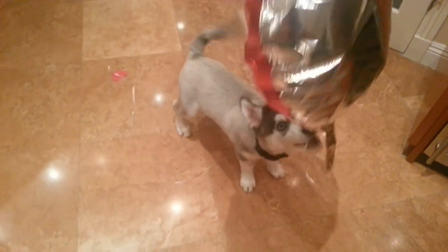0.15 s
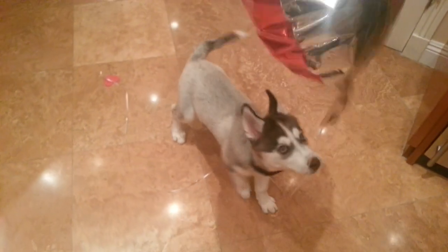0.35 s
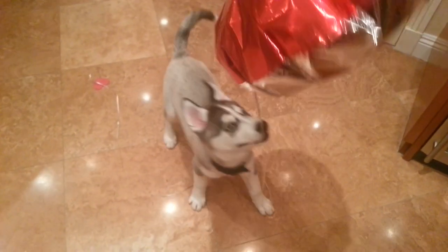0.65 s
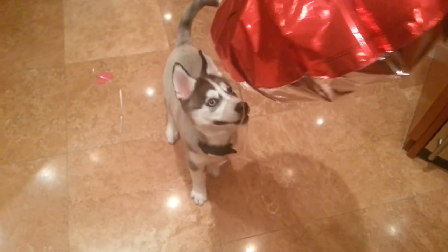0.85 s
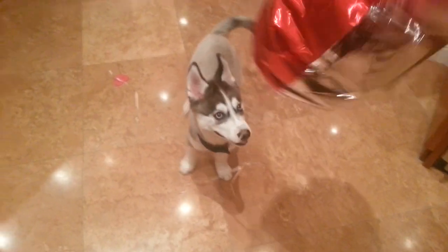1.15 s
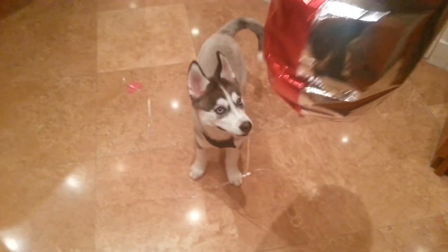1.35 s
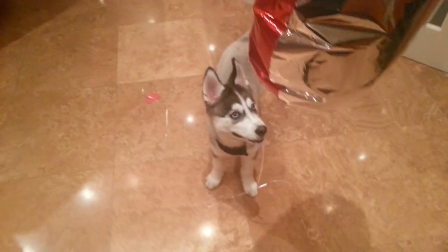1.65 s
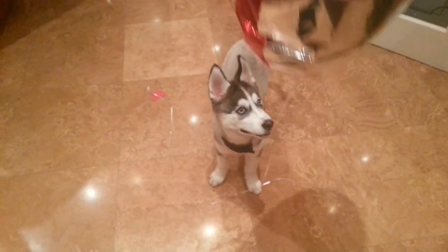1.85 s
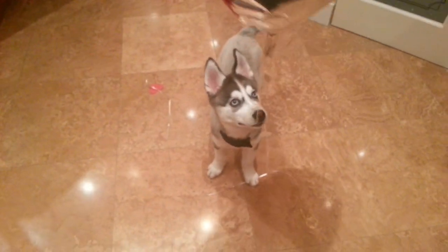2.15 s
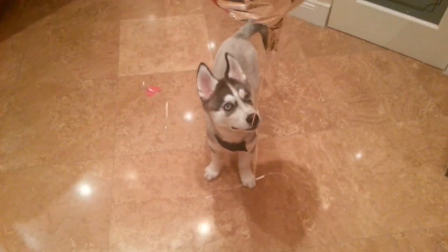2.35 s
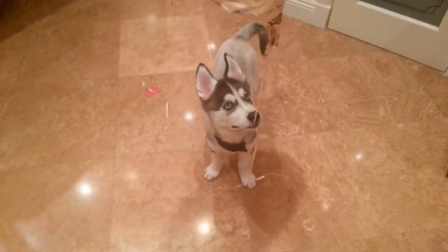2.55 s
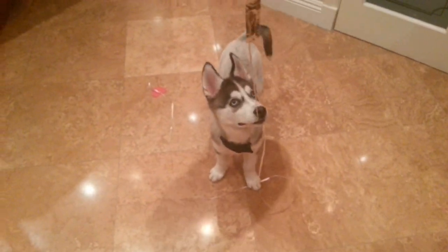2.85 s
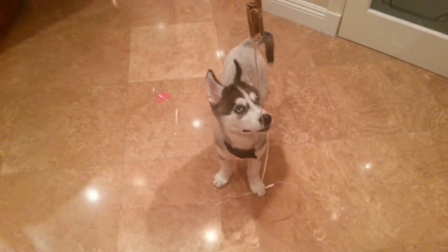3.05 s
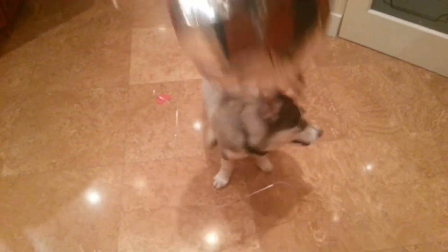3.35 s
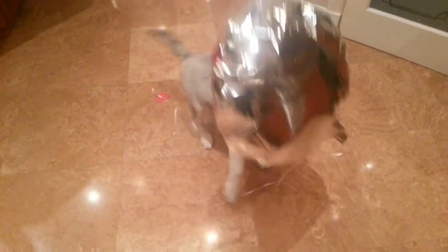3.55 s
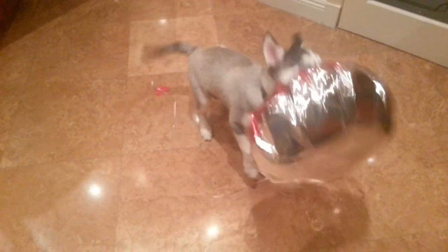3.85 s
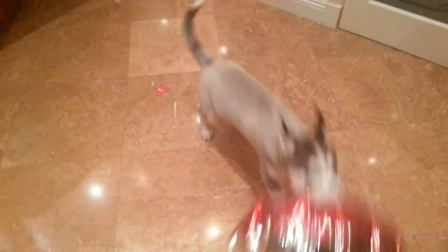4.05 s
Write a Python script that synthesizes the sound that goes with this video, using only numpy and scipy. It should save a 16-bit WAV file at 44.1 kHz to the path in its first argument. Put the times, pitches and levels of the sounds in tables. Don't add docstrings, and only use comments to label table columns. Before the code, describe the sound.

A puppy paws and bites a foil balloon, crackling and ticking on hard tiles, pauses with one huff, then pounces again over a low motor hum.

```python
import sys
import numpy as np
from scipy import signal
from scipy.fft import rfft, irfft
from scipy.io import wavfile

SR = 44100
rng = np.random.default_rng(int(sys.argv[2]) if len(sys.argv) > 2 else 0)


def linear_from_db(decibels):
    return 10 ** (np.asarray(decibels, float) / 20)


def file_out(sig):
    cols = np.atleast_2d(sig).T
    lim = np.clip(cols, -1, 1)
    pcm = np.round(lim * 32767).astype(np.int16)
    wavfile.write(sys.argv[1], SR, pcm)


N = 185437


def evened(x):
    return x / np.sqrt(np.mean(x ** 2) + 1e-20)


def read(points, hz):
    f, value = np.transpose(points)
    return np.interp(np.log(hz + 1), np.log(f + 1), value)


def colour(x, gain):
    log_gain = np.log(np.maximum(gain(abs(np.fft.fftfreq(4096, 1 / SR))), 1e-5))
    taps = np.fft.ifft(np.exp(np.conj(signal.hilbert(log_gain)))).real[:2048]
    taps = taps.reshape((1,) * (x.ndim - 1) + (-1,))
    return signal.oaconvolve(x, taps, axes=-1)[..., :x.shape[-1]]


def filtered(x, order, hz, kind="low", axis=-1):
    return signal.sosfilt(signal.butter(order, hz, kind, fs=SR, output="sos"), x, axis=axis)


def pair(a, b):
    # (frequency [Hz], left-right likeness [-1..1])
    likeness = [(60, 0.21), (130, 0.79), (290, 0.78), (630, 0.42), (900, 0.56), (1400, -0.19),
                (3000, 0.0927)]
    same = np.clip(read(likeness, np.fft.rfftfreq(len(a), 1 / SR)), -1, 1)
    mixed = same * rfft(a) + np.sqrt(1 - same ** 2) * rfft(b)
    return np.array([a, irfft(mixed, len(a))])


def drift(rate_hz):
    f = np.geomspace(rate_hz / 20, rate_hz, 16)
    t = np.arange(0, N + 64, 64) / SR
    slow = np.sin(2 * np.pi * (np.outer(t, f) + rng.random(16))) @ f ** -.5
    return np.interp(np.arange(N) / SR, t, evened(slow))


def add(mix, s, sound):
    mix[round(s * SR):][:len(sound)] += sound


def tone(hz, db, waver_db, rate_hz, start_turns=None):
    start = rng.random() if start_turns is None else start_turns
    turns = hz * np.arange(N) / SR + start + 0.12 * drift(rate_hz)
    return np.sqrt(2) * linear_from_db(db + waver_db * drift(rate_hz)) * np.cos(2 * np.pi * turns)


def motor():
    # (multiple of shaft rate [1], level [dB rms])
    orders = [(4, -66.5), (5, -72), (7, -57.5), (8, -81), (12, -60), (13, -66.5), (19, -67.5), (20, -67.5),
              (22, -59.5), (23, -59), (25, -73)]
    # (time [s], level [dB])
    sixth_course = [(0.0, -51), (0.46, -43.5), (0.71, -44.5), (0.81, -58.5), (0.97, -44), (1.37, -46),
                    (1.65, -54), (1.71, -47.5), (2.2, -46.5), (2.33, -48.5), (2.37, -42.5), (3.04, -50),
                    (3.27, -42), (3.65, -54.5), (3.82, -45.5), (4.06, -44), (4.09, -52), (4.2, -45)]
    # (frequency [Hz], level [dB rms])
    whines = [(1051, -73), (1183, -78), (1243, -81), (2568, -87), (2659, -85), (7981, -89.5)]
    # (frequency [Hz], density [dB per Hz])
    rumble = [(40, -23.5), (75, -26), (110, -2.5), (160, -1), (270, -1.5), (420, -9.5), (550, -5.5),
              (700, -12), (850, -22.5), (1200, -27), (1800, -30.5), (4000, -39), (8000, -45.5),
              (13500, -63), (14500, -87)]
    shaft_hz, knock_turn = 24.26, .5
    mains_hz, mains_db = 58.802, -59
    node_s, node_gap_s, node_depth = .06, 2.05, .75
    t = np.arange(N) / SR

    sixth_db = np.interp(t, *np.transpose(sixth_course))
    swell_db = -48.5 + 0.19 * (sixth_db + 45.5)
    lines = np.zeros(N)
    for k, db in orders:
        lines += tone(k * shaft_hz, db, 2.8, 8, -k * knock_turn if k > 18 else None)
    lines *= linear_from_db(2.436 * (swell_db - swell_db.mean()))
    antinode = 1 - node_depth * abs(np.cos(np.pi * (t - node_s) / node_gap_s)) ** 2.771
    lines += antinode * tone(mains_hz, mains_db, 0.21, 3.041)
    lines += tone(6 * shaft_hz, sixth_db - 2.0, 1.0, 7.6)
    whine = np.array([sum(tone(hz, db, 3, 6) for hz, db in whines) for port in range(2)])

    noise = rng.standard_normal((2, N))
    air = evened(pair(*colour(noise, lambda hz: linear_from_db(read(rumble, hz)))))
    turns = shaft_hz * t + .5 - knock_turn
    force = linear_from_db(3 * rng.uniform(-1, 1, int(turns[-1]) + 2))[turns.astype(int)]
    throb = force * np.sin(np.pi * turns) ** 2 * 1.036 - .5
    knock = filtered(air, 2, (300, 760), "band")
    low = filtered(air + throb * knock, 2, 900)
    far = filtered(air, 2, 900, "high")
    return lines + whine + linear_from_db(swell_db) * low - linear_from_db(-50.3) * far


def room(x):
    # (frequency [Hz], T60 [s])
    t60 = [(200, 0.79), (1000, 0.38), (3000, 0.54), (7000, 0.25), (13000, 0.21)]
    places = np.arange(60, SR // 2 - 40, 20)
    at = places + rng.integers(0, 20, (2, len(places)))
    taps = np.zeros((2, SR // 2))
    np.put_along_axis(taps, at, rng.choice([-1., 1.], at.shape), 1)
    hz, t, z = signal.stft(taps, SR, nperseg=64)
    dying = z * linear_from_db(-60 * t / read(t60, hz)[:, None])
    tail = pair(*signal.istft(dying, SR, nperseg=64)[1])
    return signal.oaconvolve(x[None], tail / np.linalg.norm(tail[0]), axes=1)[:, :N]


def huff():
    # (frequency [Hz], gain [dB])
    nose = [(150, -8), (500, 8), (1000, 4), (2200, 4), (4000, -4), (7000, -7.5), (9500, -9), (12000, -27),
            (14500, -48)]
    start_s, rise_s, hold_s, spent_s = 2.294, 0.051, 0.029, 0.32
    level_db, fall_db_per_s = -31, 67.5
    since = np.arange(N) / SR - start_s
    body, top = rng.standard_normal((2, 2, N))
    air = evened(pair(*colour(body, lambda hz: linear_from_db(read(nose, hz)))))
    fizz = evened(filtered(top, 6, (9500, 13800), "band"))
    rise = np.clip(since / rise_s, 0, 1) ** 1.3
    after = np.maximum(since - rise_s - hold_s, 0)
    fall_db = fall_db_per_s * after + 10 * (after / spent_s) ** 3
    return rise * linear_from_db(level_db - 2.0 - fall_db) * (air + linear_from_db(-5 - 230 * abs(since)) * fizz)


def squeaks(width_hz=90):
    # (start [s], end [s], pitch [Hz], level [dB])
    slips = [
        (.93, 1.06, 3430, -70),
        (0.949, 1.001, 2000, -62.5),
        (2.715, 3.2, 2590, -82.5),
        (3.12, 3.5, 3430, -67),
        (3.449, 3.76, 3436, -73),
        (3.376, 3.456, 1738, -61.5),
        (3.502, 3.566, 1885, -68),
    ]
    out = np.zeros((N, 2))
    for start, end, hz, db in slips:
        noise = rng.standard_normal((round((end - start) * SR), 2))
        whistle = evened(filtered(noise, 2, (hz - width_hz / 2, hz + width_hz / 2), "band", axis=0))
        add(out, start, linear_from_db(db) * whistle * np.hanning(len(noise))[:, None] ** .5)
    return out.T


def thuds():
    # (time [s], peak [dB], pitch [Hz], decay [ms])
    blows = [(0.2882, -15, 310, 2.2), (0.2943, -24, 443.4, 3), (0.2886, -29.5, 856, 2.113),
             (.38, -28.5, 590, 5.46), (1.001, -39.5, 902, 4.154), (3.917, -30.5, 520, 12),
             (3.94, -27, 410, 5.67), (3.964, -21.5, 874.6, 2.4), (3.983, -21, 459.9, 1.904),
             (4.011, -27.5, 337, 4.3), (4.048, -37, 381.1, 8), (4.119, -31, 296.9, 8.3)]
    out, t = np.zeros(N + 2048), np.arange(2048) / SR
    for s, db, hz, ms in blows:
        add(out, s, linear_from_db(db - 3.5) * np.sin(2 * np.pi * hz * t) * np.exp(-t * 1000 / ms))
    return filtered(out[:N], 2, 170, "high")


def halves(x):
    # (frequency [Hz], gain [dB])
    foil = [(200, -8.5), (700, 1), (1200, 1), (3000, 1.5), (6000, 4.5), (9000, 1), (12000, -7.5),
            (14000, -7), (16500, -49)]

    def part(slope):
        return evened(colour(x, lambda hz: linear_from_db(read(foil, hz)) / np.sqrt(1 + (hz / 4000 + 1e-6) ** slope)))

    return part(6), part(-6)


def peak(x):
    return abs(x).max((1, 2), keepdims=True)


def snaps(shared=0.63):
    # (time [s], peak [dB], body relative [dB])
    ticks = [(0.0275, -20.5, -21), (0.0728, -23, -22.5), (0.2879, -26.5, -2.5), (0.2947, -26, -11.5),
             (0.379, -25, -17), (0.6166, -26, -28), (0.623, -29, -26), (0.6592, -29, -17.5),
             (0.9051, -33.5, -12), (0.9302, -32, -16), (1.0686, -42, -9), (1.0874, -32, -14),
             (1.105, -29.5, -22), (1.1592, -36, -16), (1.171, -41.5, -18), (1.3209, -33, -17.5),
             (1.3545, -31, -6), (1.955, -39.5, -10.5), (2.0082, -39, -18), (2.0552, -46.5, -11),
             (3.2293, -31, -16.5), (3.256, -32, -30), (3.2852, -25, -18), (3.3361, -41, -24),
             (3.3996, -34, -31.5), (3.4064, -28, -26), (3.414, -34.5, -21), (3.7882, -31.5, -18),
             (3.8322, -35, -17), (3.9914, -13.5, -9.5)]
    # (time [s], peak [dB], body relative [dB], length [ms])
    crunches = [(0.0004, -13.5, -35, 2.486), (0.0623, -17.5, -10, 5.3), (0.189, -16.5, -12.5, 4.388),
                (0.3667, -27, -12, 3.223), (0.3947, -30.5, -29.5, 3.8), (1.1073, -32, -22.5, 3.5),
                (1.261, -35.5, -13, 2.514), (1.4143, -28.5, -39, 4.1), (3.1117, -43, -10, 4.2),
                (3.9154, -23, -20.5, 2.226), (3.9799, -13, -13.5, 3.1)]
    tick_ms = .27
    rows = [(*row, tick_ms) for row in ticks] + list(crunches)
    s, db, body_db, ms = np.transpose(rows)[..., None, None]
    u = np.arange(2048) / SR * 1000 / ms
    noise = rng.standard_normal((len(s), 3, 2048))
    cracks = noise[:, 1:] + shared * noise[:, :1]
    low, high = halves(cracks * u * np.exp(-u * 1.44))
    bright = linear_from_db(db - 4.5 - 2.413 * ms) * high / peak(high)
    dull = linear_from_db(db + body_db + 1.0) * low / peak(low)
    out = np.zeros((N + 2048, 2))
    for at, snap in zip(s.ravel(), bright + dull):
        add(out, at, snap.T)
    return out[:N].T


def crease_level(lingers, dull_share):
    # (time [s], bright crackle [dB], dull rustle relative [dB], time to fall 20 dB [s])
    nudges = [(.001, -32.5, -6.5, 0.09), (.189, -37, -3, .06), (0.29, -40, -6, 0.02),
              (0.37, -34.5, -4.5, 0.1175), (.618, -42, -11, 0.04), (0.905, -50, -6.5, 0.16),
              (.93, -53, -6, 0.12), (1.065, -51, 2.2, 0.11), (1.167, -49, -4.5, 0.1849),
              (1.268, -44, -3.5, .07), (1.323, -46, -5, 0.08), (1.416, -44, -3, .04),
              (1.36, -52, -2.2, .06), (1.953, -59, -8, .05), (2.008, -56, -2.5, 0.046),
              (2.116, -61, -3.5, .09), (2.226, -72.5, 11, 0.2), (3.113, -55, -4.5, 0.9),
              (3.224, -50, -3, 0.11), (3.404, -40.5, -9, 0.06), (3.664, -57.5, -5, 0.9),
              (3.783, -43, -5.5, 0.5), (3.918, -30.5, -1.5, 0.18)]
    # (middle [s], bright crackle [dB], dull rustle relative [dB], middle to 20 dB down [s])
    rubs = [(.062, -30.5, -8, .06), (.14, -46.5, -4.5, 0.2116), (.245, -47.5, -2.5, 0.11),
            (.335, -49, -4.5, 0.09), (.392, -36.5, -5.5, 0.0672), (.52, -48.5, -6.5, 0.232),
            (.68, -58, 2.5, 0.0831), (.82, -74.5, 11, 0.12), (1.02, -62.5, 6.5, 0.08),
            (1.108, -41, -4.5, 0.0261), (1.21, -56, 1.3, 0.12), (2.79, -66, 3.5, 0.26),
            (3.08, -66.5, -1, 0.1), (3.255, -50.5, -4, .06), (3.35, -60, -4, 0.19), (3.532, -56.5, 2, 0.08),
            (3.84, -40, -3, 0.0541), (3.979, -28.5, -2.5, 0.0034), (4.062, -36.5, -4, 0.05),
            (4.16, -42, 0, .16)]
    rise_s, rub_round = .009, 1.5
    t, power = np.arange(N) / SR, np.zeros(N)
    for s, db, rel_db, fall in nudges:
        down_db = 20 * np.maximum((s - t) / rise_s, (t - s) / (fall * lingers))
        power += linear_from_db(2 * (db + dull_share * rel_db - down_db))
    for s, db, rel_db, half in rubs:
        down_db = 20 * (abs(t - s) / (half * lingers)) ** rub_round
        power += linear_from_db(2 * (db + dull_share * rel_db - down_db))
    return np.sqrt(power)


def creases(per_s=3500, spread_db=3.0, clump_db=2.1, shared=0.5548):
    bright = crease_level(1, 0)
    dull = crease_level(1.25, 0.96)
    uneven_db = spread_db * np.minimum(rng.exponential(1, (3, N)), 3)
    size = linear_from_db(uneven_db + clump_db * np.clip(drift(300), -2.5, 1.4))
    sign = np.sign(rng.standard_normal((3, N)))
    both, *own = size * sign * (rng.random((3, N)) < per_s / SR)
    heard = np.array(own) + shared * np.array([both, np.roll(both, 5)])
    low, high = halves(heard)
    return linear_from_db(-5) * bright * high + linear_from_db(-0.5) * dull * low


def scene():
    foil, snap, thud = creases(), snaps(), thuds()
    wet = linear_from_db(-6) * foil[0] + linear_from_db(-6.5) * snap[0] + linear_from_db(-4.5) * thud
    turn = np.pi * np.arange(N) / SR / .07
    tails = room(wet * np.cos(turn)) + room(wet * np.sin(turn))
    return foil + snap + thud + tails + squeaks() + huff() + motor()


def roll_off(x):
    return signal.sosfilt(signal.butter(12, 15310, fs=SR, output="sos"), x)


def record(dry):
    # (frequency [Hz], width [Hz], gain [dB])
    cavities = [
        [(5360, 2600, 10), (8286, 2400, -1)],
        [(2000, 1780, 4), (7400.9, 2410.6, 15), (11700, 4533.4, 4.5)],
    ]
    right_db, hiss_db = 1.2971, -66.5

    def lift(modes):
        return lambda hz: linear_from_db(sum(db / (1 + (2 * (hz - f) / w) ** 2) for f, w, db in modes))

    ports = np.array([colour(x, lift(modes)) for x, modes in zip(dry, cavities)])
    hiss = filtered(rng.standard_normal(dry.shape), 16, 13500)
    ports = ports * linear_from_db(np.array([[-.5], [.5]]) * right_db) + linear_from_db(hiss_db) * hiss
    return roll_off(filtered(ports, 2, 48, "high"))


dry = scene()
out = record(dry)
file_out(out)
```